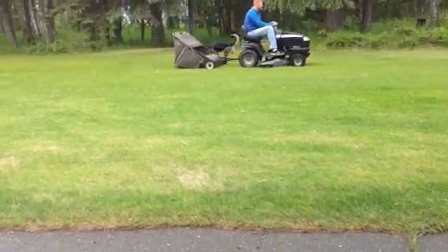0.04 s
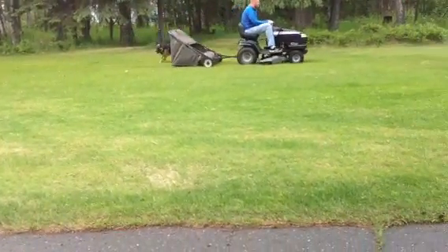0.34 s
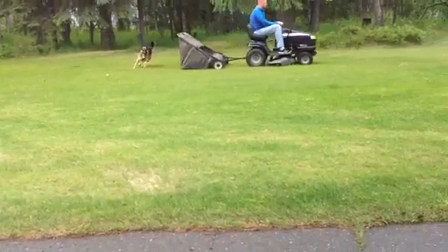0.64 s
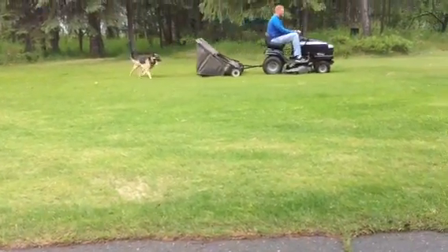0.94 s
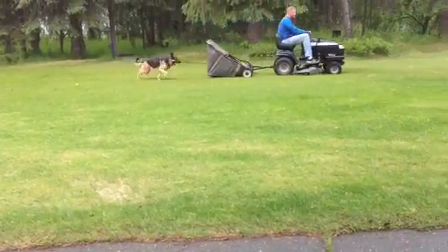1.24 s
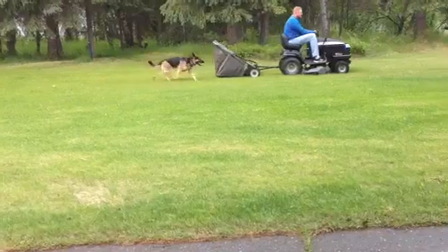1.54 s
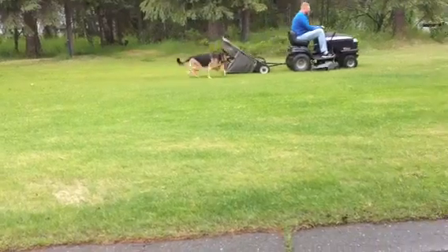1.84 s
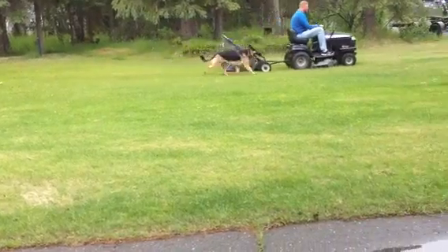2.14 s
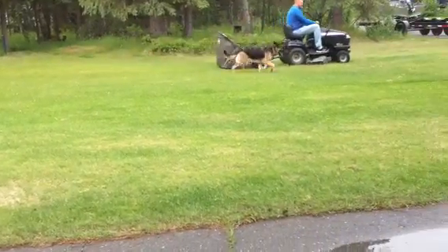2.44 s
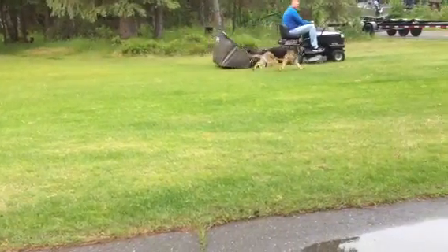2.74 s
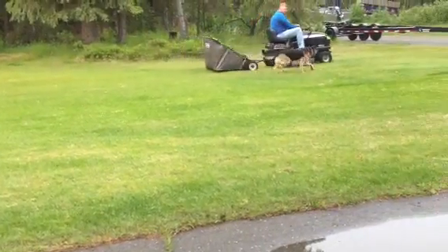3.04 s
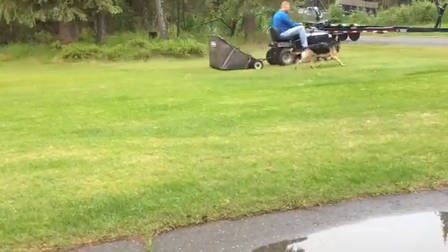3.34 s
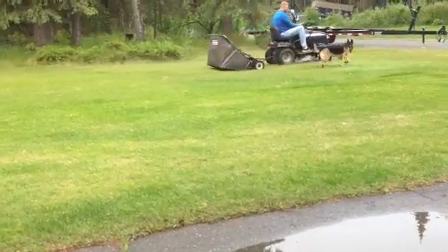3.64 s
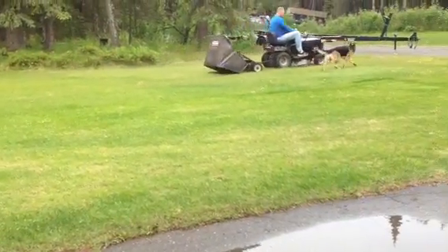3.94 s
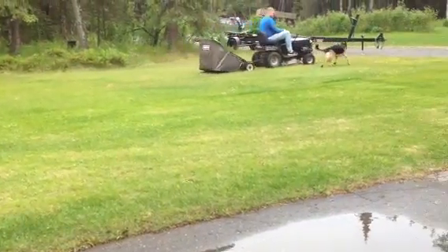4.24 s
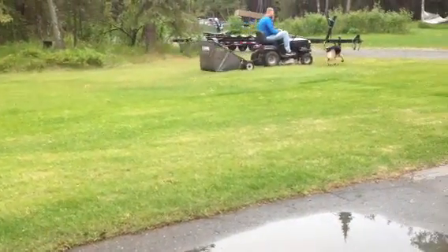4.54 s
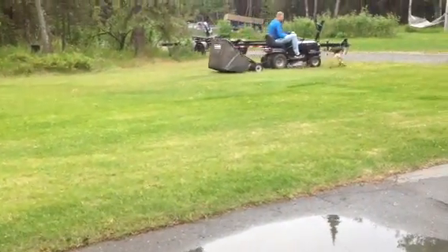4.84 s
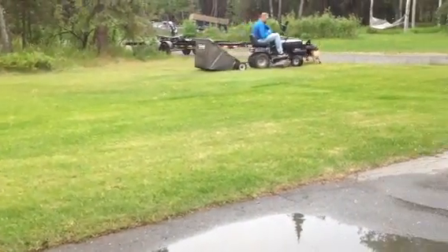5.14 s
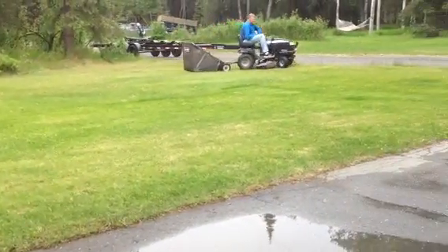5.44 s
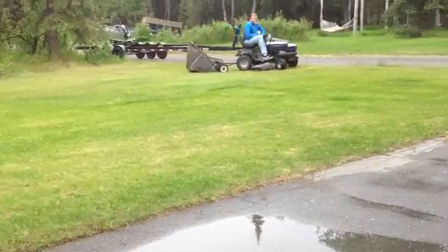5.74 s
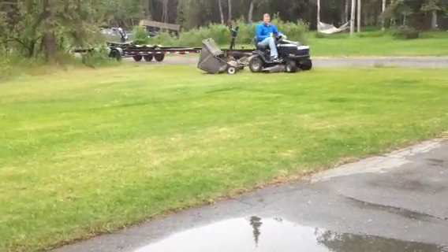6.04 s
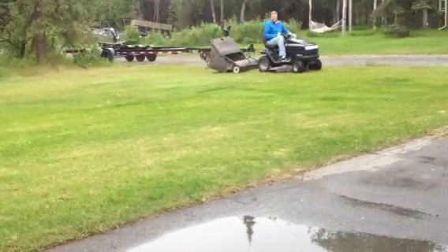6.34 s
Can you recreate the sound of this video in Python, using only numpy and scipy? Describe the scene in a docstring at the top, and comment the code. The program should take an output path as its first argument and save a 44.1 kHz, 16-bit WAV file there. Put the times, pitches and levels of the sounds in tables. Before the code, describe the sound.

Outdoors on open grass, a riding mower is heard from a distance, its engine throbbing low and even, mixed with a swelling blade hum and a faint rush of air. Midway the exhaust becomes slightly muffled as the machine goes by. A single brief knock sounds, then the engine opens up again near the end, all under a soft steady hiss.

```python
"""A riding mower with a V-twin engine tows a sweeper across a lawn. From the start, uneven pairs of
firings thump in the muffler; two belt-driven blades hum a little under the engine's note and beat
with it; fan and machinery rush faintly, and a soft steady hiss lies over everything.
At 2.6 s the mower passes some fifteen metres away and its body shades the muffler.
At 4.1 s something knocks once. Near 5 s the mower starts to turn and the exhaust brightens again."""
import sys
import numpy as np
from scipy import signal
from scipy.fft import rfft, irfft, next_fast_len
from scipy.io import wavfile
from scipy.ndimage import uniform_filter1d

SR = 44100
rng = np.random.default_rng(int(sys.argv[2]) if len(sys.argv) > 2 else 0)


def generate_wav(signal):
    """Clip the signal to [-1, 1] and save it as 16-bit WAV at the path in sys.argv[1]."""
    frames = np.transpose(np.atleast_2d(signal))
    scaled = np.clip(frames, -1, 1) * 32767
    pcm = np.round(scaled).astype(np.int16)
    wavfile.write(sys.argv[1], SR, pcm)


N = 281799
T = np.arange(N) / SR


def exhaust(cycle):
    """The second cylinder fires 3/4 of a crank turn after the first; both ring the muffler."""
    # muffler response: (frequency [Hz], relative gain [dB])
    muffler = [(53, -39), (79, -23.5), (105, -23), (132, -1), (158, 2.5), (185, -3), (211, -3), (238, -5.5),
               (290, -12), (345, -22.5), (372, -23.5), (400, -31), (470, -46.5), (1500, -100)]
    # thump: (time [s], level in 120-150 Hz [dB])
    thump_levels = [(0, -48.2), (.55, -46.7), (1.15, -48.3), (2.05, -46.5), (3.05, -48), (3.75, -47),
                    (4.5, -48.5), (5.7, -48.5), (6.39, -47)]
    start_cycles = -.008
    first = firings(cycle, start_cycles, scatter_db=.6, jitter_s=.00012)
    second = firings(cycle, start_cycles + 3 / 8, scatter_db=.5, jitter_s=.0001)
    thumps = -unit(colour(first + undb(-.4) * second, muffler), 120, 150)
    # the mower's body shades the muffler in passing, the higher the more
    shade_db = moved(2.5, pass_db=-6.5, turn_db=7) + .7 * walk(3.04)
    for edge_hz, share in [(228, 1), (315, .28)]:
        thumps = thumps + band_change(thumps, edge_hz, 600, share * shade_db)
    return thumps * undb(curves(thump_levels)[0])


def firings(cycle, offset_cycles, scatter_db, jitter_s):
    """One cylinder: a pulse per cycle, scattered in strength and timing."""
    count = int(cycle[-1]) + 1
    timing, strength = rng.standard_normal((count, 2)).T
    due_s = np.interp(np.arange(count) + offset_cycles, cycle, T, right=2 * T[-1])
    at = (due_s + jitter_s * timing) * SR
    heard = (at >= 0) & (at < N)
    return np.bincount(at[heard].astype(int), undb(scatter_db * strength[heard]), N)


def blades(cycle, engine):
    """Each blade passes four times a cycle, less belt slip, beating with the engine and the other."""
    # belt drive, per blade: (slip [fraction of speed], time hum is in step with engine [s])
    belts = [(.01089, 2.98), (.00773, 3.075)]
    # hum at twice the pass rate, beamed as the mower moves: (time [s], blade 1 [dB], blade 2 [dB])
    hum_levels = [(0, -53, -49.5), (.8, -73, -45.5), (1.95, -44.5, -68), (3, -37.5, -61.5),
                  (3.5, -45.5, -59.5), (4.45, -38, -50.5), (5.7, -46.5, -61.5), (6.39, -37, -70)]
    # overtones: (multiple of pass rate, blade 1 on approach [dB], pass change [dB], turn change [dB])
    overtones = [(3, -60.5, -1, 5), (4, -66.5, -9, -2.5), (5, -88, 0.5, 1), (6, -90, 0, 1.5),
                 (7, -87.5, 0, 1), (8, -83.5, 0, -1), (9, -87.5, -1.5, -1.5)]
    # drone swells as the blades fall into step: (time [s], added peak [dB])
    swells = [(.02, -48), (3.36, -55.5), (6.08, -48)]
    swell_sigma_s, drone_floor_db = .22, -61
    engine_rad = np.angle(np.mean(engine * np.exp(-2j * np.pi * 8 * cycle)))  # harmonic nearest the hum

    def pass_phase(slip, in_step_s):
        """Phase of a blade falling steadily behind the engine."""
        slipped = cycle - slip * (cycle - np.interp(in_step_s, T, cycle))
        return 2 * np.pi * 4 * slipped + engine_rad / 2

    out = 0
    for (slip, in_step_s), hum_db, trim_db in zip(belts, curves(hum_levels), (0, -3.5)):
        out += undb(hum_db + .27 * walk(9)) * np.cos(2 * pass_phase(slip, in_step_s))
        phase = pass_phase(slip, in_step_s=3.04)  # both blades' overtones add up here
        for multiple, *levels_db in overtones:
            gain = undb(moved(*levels_db) + trim_db + 1.6 * walk(5.5))
            out += gain * np.cos(round(multiple) * phase + .15 * walk(7))
    swell = sum(undb(db) * np.exp(-((T - at_s) / swell_sigma_s) ** 2 / 2) for at_s, db in swells)
    drone_gain = (undb(drone_floor_db) + swell) * undb(.53 * walk(7))
    return out + drone_gain * np.cos(pass_phase(*belts[0]) + .15 * walk(8.4))


def machinery(cycle):
    """Air rushes through deck and cowl, pulsing with the crank; the block shakes; fan and gears whine."""
    # air rush: (frequency [Hz], relative gain [dB])
    rush_spectrum = [(20, -23), (40, -10.5), (70, -3), (110, 13.5), (200, 22), (300, 19.5), (380, 8.5),
                     (470, -3), (570, -7), (820, -2.5), (1130, -3.5), (1300, -6.5), (1500, -12),
                     (5000, -35.5)]
    # gears, flywheel fan: (multiple of cycle rate, approach [dB], pass change [dB], turn change [dB])
    whines = [(36, -79.5, -4, -1), (40, -75.5, -14, 3)]
    crank = np.cos(2 * np.pi * 2 * cycle)
    rush = unit(colour(rng.standard_normal(N), rush_spectrum), 735, 1400) * (1 + .066 * crank)
    # the lawn reflection cancels a band that fills in on the turn
    lawn_dip = band_change(rush, 420, 700, moved(-1, pass_db=-.4, turn_db=3))
    upper_fan = band_change(rush, 950, 1300, moved(-.2, pass_db=-1, turn_db=.8))
    rush_db = moved(-71, pass_db=-1, turn_db=.9) + .5 * walk(9.9)
    shake = undb(-83.5 + 1.8 * walk(7)) * crank
    out = (rush + lawn_dip + upper_fan) * undb(rush_db) + shake
    for multiple, *levels_db in whines:
        gain = undb(moved(*levels_db) + 1.9 * walk(6.5))
        out += gain * np.cos(2 * np.pi * round(multiple) * cycle + .26 * walk(6.9))
    return out


def knock(start_s=4.142, peak_db=-49.5, contact_s=.00061):
    """One short, dull knock; the soft contact rounds its start."""
    # ringing modes: (frequency [Hz], t60 [s], relative level [dB])
    modes = [(540, 0.02, -2), (624, 0.019, 6), (1050, .01, -10), (1400, 0.012, -1), (1750, 0.011, -11)]
    age_s = np.maximum(T - start_s, 0)
    ring = sum(undb(db - 60 * age_s / t60_s) * np.sin(2 * np.pi * hz * age_s) for hz, t60_s, db in modes)
    ring *= 1 - np.exp(-age_s / contact_s)
    return undb(peak_db) * ring / np.max(np.abs(ring))


def hiss(level_db=-77):
    """Smooth background hiss, barely wavering."""
    # hiss: (frequency [Hz], relative gain [dB])
    spectrum = [(1180, -29), (2000, -3.5), (2560, -1.5), (2930, -3.5), (6620, -5), (9690, -14),
                (13600, -4.5), (14700, -3.5), (15200, -5.5)]
    gain = undb(level_db + .14 * walk(7.3))
    return gain * unit(colour(rng.standard_normal(N), spectrum), 3000, 15000)


def moved(approach_db, pass_db, turn_db):
    """Level [dB] easing by pass_db as the mower draws level, then by turn_db as it turns."""
    pass_s, pass_ease_s = 2.6, .26
    turn_s, turn_ease_s = 5.07, .16
    passed = (1 + np.tanh((T - pass_s) / (2 * pass_ease_s))) / 2
    turned = (1 + np.tanh((T - turn_s) / (2 * turn_ease_s))) / 2
    return approach_db + pass_db * passed + turn_db * turned


def undb(db):
    """Decibels to gain."""
    return 10 ** (np.asarray(db) / 20)


def curves(table):
    """Table columns, interpolated linearly in time."""
    times_s, *columns = np.transpose(table)
    return [np.interp(T, times_s, column) for column in columns]


def band(x, lo_hz, hi_hz):
    """Zero-phase band-pass."""
    sos = signal.butter(4, [lo_hz, hi_hz], "band", fs=SR, output="sos")
    return signal.sosfiltfilt(sos, x, padtype="even", padlen=8000)


def band_change(x, lo_hz, hi_hz, gain_db):
    """Signal that, added to x, shifts one band by gain_db."""
    return (undb(gain_db) - 1) * band(x, lo_hz, hi_hz)


def unit(x, lo_hz, hi_hz):
    """Scale x to rms 1 within a band."""
    return x / np.std(band(x, lo_hz, hi_hz))


def colour(x, points):
    """Minimum-phase filter through points (frequency [Hz], gain [dB])."""
    size = 2 * next_fast_len(N // 2 + 8192)
    hz, db = np.transpose(points)
    bins_hz = np.arange(size // 2 + 1) * SR / size
    gain_db = np.interp(np.log(bins_hz + 1e-9), np.log(hz), db)
    cepstrum = irfft(np.log(undb(gain_db)))
    cepstrum[1:size // 2] *= 2
    cepstrum[size // 2 + 1:] = 0
    return irfft(rfft(x, size) * np.exp(rfft(cepstrum)))[:N]


def walk(rate_hz):
    """Slow random drift: held steps smoothed twice, standard deviation 1."""
    hold = int(SR / rate_hz)
    steps = np.repeat(rng.standard_normal(N // hold + 1), hold)
    drift = uniform_filter1d(uniform_filter1d(steps, hold), hold)[:N]
    return drift / np.std(drift)


def scene():
    """One engine speed drives exhaust, blades and fan."""
    # speed as the governor hunts: (time [s], four-stroke cycle rate [Hz])
    speed = [(0.0, 26.5), (1.9, 26.57), (2.35, 26.3), (2.7, 26.25), (3.05, 26.66), (3.6, 25.97),
             (4.1, 26.25), (4.6, 26.27), (5.0, 26.69), (5.4, 26.22), (5.9, 26.46), (6.39, 26.2)]
    cycle = np.cumsum(curves(speed)[0]) / SR
    engine = exhaust(cycle)
    return (engine + blades(cycle, engine) + machinery(cycle) + knock() + hiss())[None]


def record(dry):
    """Steep elliptic low-pass."""
    cutoff_hz = 15350
    return signal.sosfilt(signal.ellip(12, .1, 80, cutoff_hz, fs=SR, output="sos"), dry)


dry = scene()
out = record(dry)
generate_wav(out)
```